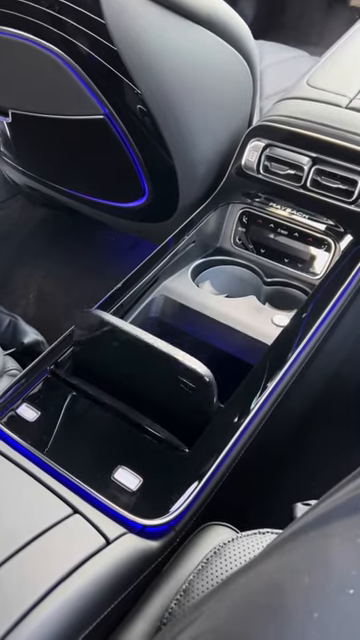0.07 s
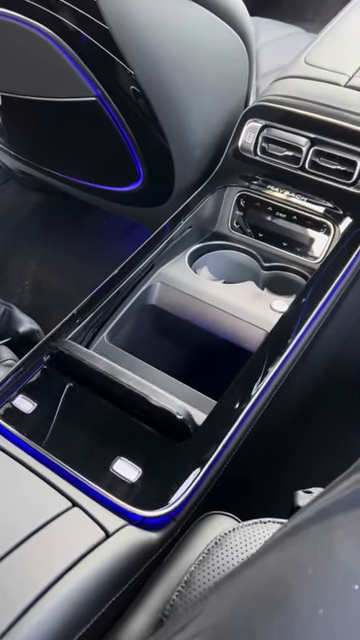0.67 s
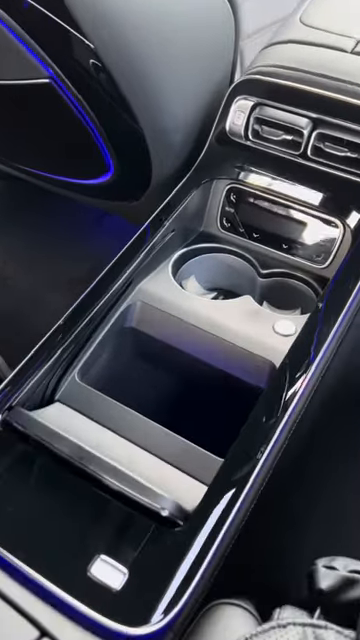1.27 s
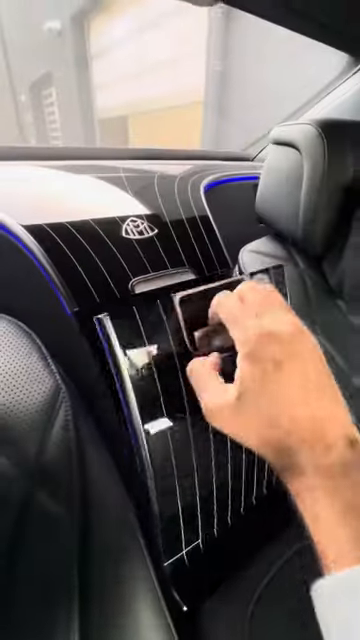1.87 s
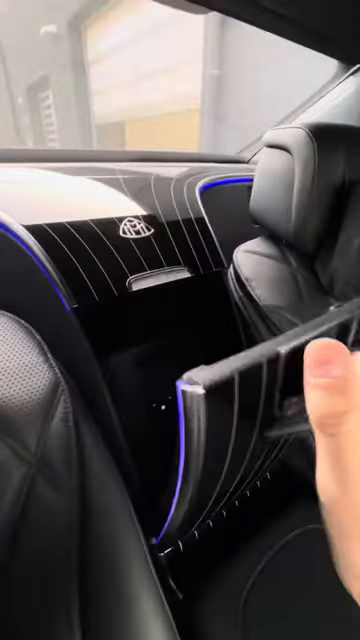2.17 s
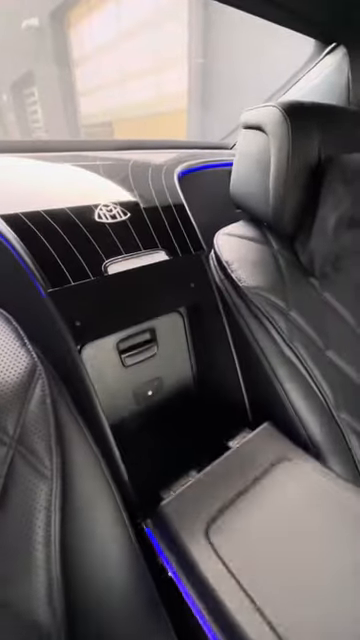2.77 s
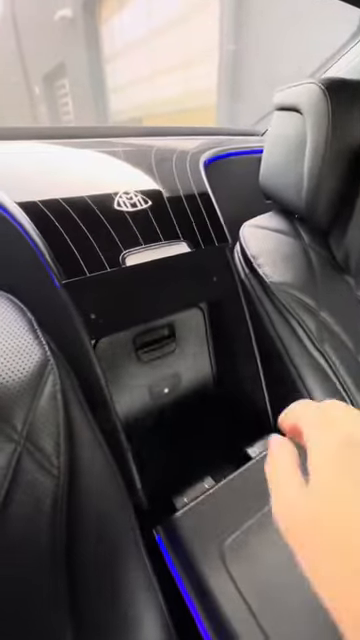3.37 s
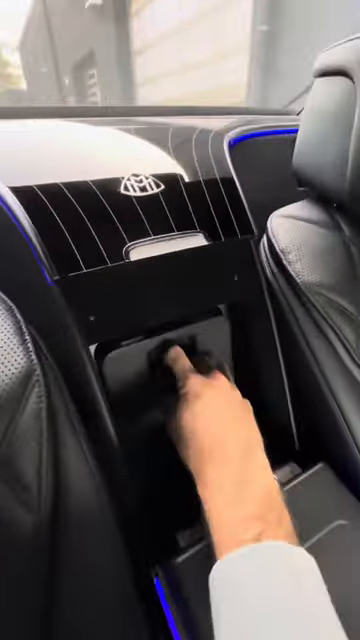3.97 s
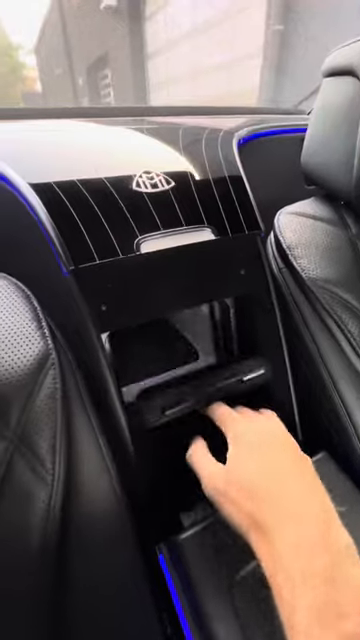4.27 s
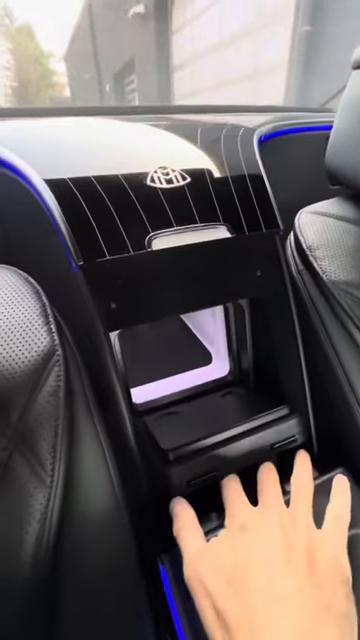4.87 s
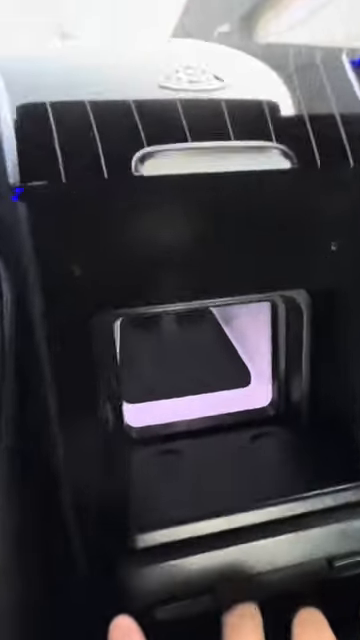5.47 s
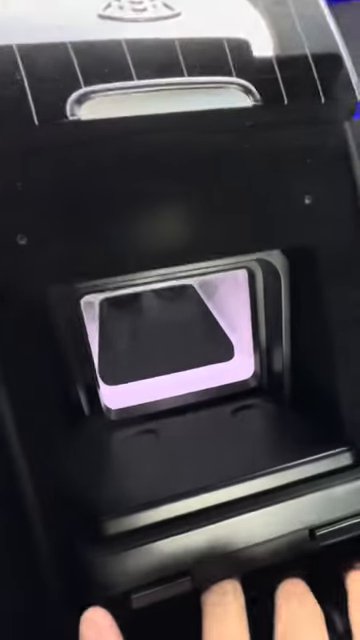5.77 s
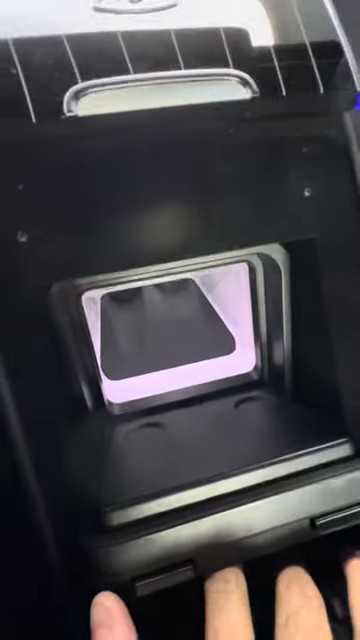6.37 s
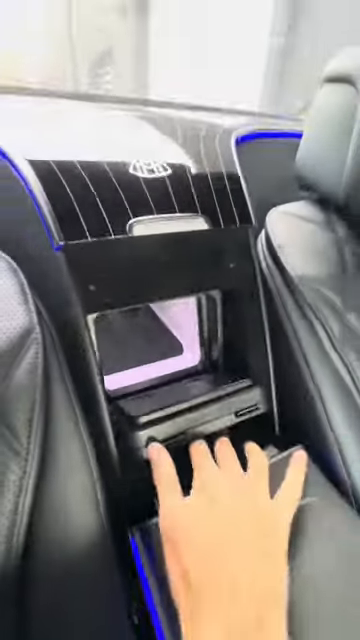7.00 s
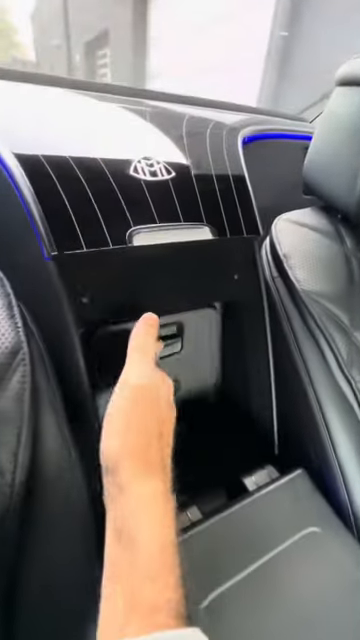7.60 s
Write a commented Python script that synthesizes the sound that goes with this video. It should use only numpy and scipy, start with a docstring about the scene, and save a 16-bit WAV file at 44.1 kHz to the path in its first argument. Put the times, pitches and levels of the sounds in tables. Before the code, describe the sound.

Inside a padded car cabin, a small geared motor whirrs as a console lid slides away. A hand unlatches the rear armrest with sharp clicks and lowers it with dull knocks and rubbing on leather. A plastic refrigerator hatch clacks open, a fan sings very faintly and a sleeve swishes. The hinge rubs, and the hatch slams shut with a hard crack and a boom. Everything is close, over the low hum of the idling engine.

```python
"""A car's rear armrest and the refrigerator hatch behind it knock and boom in the padded cabin.
First a geared motor whirrs a console lid away. Then a hand unlatches the armrest, lowers it, opens
the hatch and at last slams it shut. Each blow makes a plastic panel ring; hand, sleeve and hinges rub.
The idling engine hums underneath, and the refrigerator's fan sings faintly while the hatch is open."""
import sys
import numpy as np
from scipy import signal
from scipy.fft import rfft, irfft, next_fast_len
from scipy.io import wavfile
from scipy.ndimage import map_coordinates

SR = 44100
rng = np.random.default_rng(int(sys.argv[2]) if len(sys.argv) > 2 else 0)


def to_wav(s):
    """Save 16-bit WAV."""
    ch = np.atleast_2d(s).T  # columns
    pcm = np.round(np.clip(ch, -1, 1) * 32767)  # PCM
    wavfile.write(sys.argv[1], SR, pcm.astype(np.int16))


N = 336924
TIME = np.arange(N) / SR  # seconds since the start
AGE = np.arange(SR // 2) / SR  # seconds since a knock

# Levels in the tables are relative; t60 is the time a sound takes to fall by 60 dB.
# tone colour of rubbing: f/Hz, level/dB
RUB_SPECTRUM = [(560, -1.5), (950, -11), (1400, -5.5), (1900, -11.5), (2700, -6.5), (5000, -18.5),
                (8200, -21.5), (11000, -29), (14000, -39)]
# tone colour of clicks and thuds: f/Hz, level/dB
CLICK_SPECTRUM = [(400, 3), (1600, -3.5), (2400, 0), (3300, -8), (5000, -17), (9000, -22), (16000, -43)]


def amp(db):
    """Turn decibels into a gain."""
    return 10 ** (np.asarray(db) / 20)


def unit(x):
    """Scale to an average strength (rms) of 1."""
    return x / np.sqrt(np.mean(x ** 2) + 1e-20)


def along(points, hz):
    """Read between (frequency, value) points on a log axis."""
    f, values = np.transpose(points)
    return np.interp(np.log(hz + 1), np.log(f + 1), values)


def over_time(points):
    """Join (time, value) points into one value per sample."""
    return np.interp(TIME, *np.transpose(points))


def between(start, end, edge):
    """1 from start to end, with ramps edge seconds long."""
    return np.clip(np.minimum(TIME - start, end - TIME) / edge + .5, 0, 1)


def fade(t60, rise):
    """Rise quickly, then die away."""
    return np.exp(-np.log(1000) * AGE / t60) * (1 - np.exp(-AGE / rise))


def wobble(rate, size=N):
    """A smooth curve through rate random values a second."""
    values = rng.standard_normal(int(size * rate / SR) + 4)
    return map_coordinates(values, [np.arange(size) * rate / SR])


def add(track, s, sound):
    """Mix a sound into the track at s seconds."""
    part = track[:, max(round(s * SR), 0):][:, :sound.shape[-1]]
    part += sound[..., :part.shape[-1]]


def tone(hz, waver):
    """A slightly unsteady sine of rms 1."""
    return np.sqrt(2) * np.sin(2 * np.pi * np.cumsum(hz * (1 + waver * wobble(25))) / SR)


def resonance(hz, width):
    """A spectrum with one peak, as (f/Hz, level/dB) rows."""
    f = hz * 2 ** np.linspace(-4, 4, 401)
    return np.c_[f, -10 * np.log10(1 + ((f / hz - hz / f) * hz / width) ** 4)]


def noise(spectrum, size=N, band=None):
    """Stereo noise of rms 1 with the given tone colour, optionally within one band."""
    # how alike left and right are: f/Hz, likeness (1 = the same)
    likeness = [(250, 0.98), (700, 0.6), (2000, 0.94), (4500, 0.19), (10000, 0.8)]
    m = next_fast_len(size)
    hz = np.fft.rfftfreq(m, 1 / SR) + 1
    gain = amp(along(spectrum, hz))
    if band:
        gain = gain / np.sqrt((1 + (band[0] / hz) ** 8) * (1 + (hz / band[1]) ** 8))
    spread = np.arccos(np.clip(along(likeness, hz), -1, 1)) / 2
    white = rfft(rng.standard_normal((2, m)))
    mid, side = irfft(white * gain * [np.cos(spread), np.sin(spread)], m)[:, :size]
    return unit(np.array([mid + side, mid - side]))


def tilted(db, bright_db):
    """Low, middle and high levels: harder contact favours the treble."""
    return db - bright_db, db, db + bright_db


def rustle(db, bright_db, size):
    """Rubbing noise in three bands, the middle one eased by 1 dB."""
    # borders of the bands: f/Hz
    edges = [500, 1800, 5500, 16000]
    return sum(amp(level - (k == 1)) * noise(RUB_SPECTRUM, size, edges[k:k + 2])
               for k, level in enumerate(tilted(db, bright_db)))


def stroke(start, end, pressure_db=1.5):
    """Friction swells and dies, catching and slipping on the way; gives its onset and strength."""
    edge = .025 + (end - start) / 10
    t = np.arange(int((end - start + 2 * edge) * SR)) / SR
    swell = np.sin(np.pi / 2 * np.clip(np.minimum(t, t[-1] - t) / (2 * edge), 0, 1)) ** 2
    slips_db = 2 * wobble(420, len(t))
    return start - edge, swell * unit(amp(slips_db + pressure_db * wobble(32.6, len(t))))


def lid_motor(home_s, full_load_s=0.99, gear_hz=50.1, whine_hz=907):
    """Gears whirr, rattle and hiss; the motor slows and strains as the lid nears its stop."""
    # tones of the first gears' meshing teeth: f/Hz, level/dB
    mesh_tones = [(301, -61), (350, -66), (1249, -66.5), (1297, -68), (1952, -70.5), (3002, -77),
                  (3305, -76.5), (3895, -72), (4307, -79), (4554, -75.5)]
    # tone colour of the whirr: f/Hz, level/dB
    whirr_spectrum = [(150, -28), (240, -9), (320, -0.5), (430, -12), (680, -9), (1100, -16.5),
                      (2200, -21.5), (2750, -28), (5400, -29.5), (7000, -55)]
    load = np.clip(2 * TIME / full_load_s - 1, 0, 1)
    speed = 1 - 0.19 * load
    first_stage, moving = between(-1, 0.31, edge=0.1), between(-1, home_s, edge=0.034)
    surge_db = 7.5 * np.exp(-TIME / 0.26)
    run_on = amp(-66) * between(home_s, 1.447, edge=0.11)
    effort = moving * amp(-59 + surge_db) + run_on
    mesh = sum(amp(db + 2) * unit(amp(3 * wobble(70))) * tone(hz, waver=0.0025)
               for hz, db in mesh_tones)
    housing = resonance(4000, width=550)
    rasp = noise(housing, round(SR / gear_hz))
    buzz = amp(-66) * rasp[:, np.arange(N) % rasp.shape[1]]  # the same rasp on every turn
    hiss = moving * amp(-73) * noise(housing)
    chatter = unit(amp(2.3 * tone(2 * gear_hz * speed, waver=0.048) + wobble(29.66)))
    strain = amp(-73.5 + 11.5 * load) * between(-1, full_load_s, edge=0.18)
    whine = strain * tone(whine_hz * speed, waver=0.0057)
    return chatter * (effort * noise(whirr_spectrum) + hiss + first_stage * (mesh + buzz)) + whine


def engine_hum(firing_hz=50.74):
    """The idling engine hums at its firing rate, swelling and fading as the listener moves."""
    # strength of the deepest tone: t/s, level/dB
    hum_levels = [(0.0, -32.5), (1.37, -52.5), (1.5, -31), (1.95, -38.5), (2.14, -49), (3.13, -39),
                  (3.53, -47), (3.87, -35.5), (5.82, -41.5), (6.45, -33), (7.6, -32)]
    # higher tones: multiple of the firing rate, level/dB
    harmonics = [(2, -52), (3, -60.5)]
    phase = 2 * np.pi * np.cumsum(firing_hz * (1 + .008 * wobble(3.0))) / SR
    hum = amp(over_time(hum_levels) - 1 + 0.83 * wobble(8.1)) * np.sin(phase)
    overtones = sum(amp(db + 2.9 * wobble(6.2)) * np.sin(k * phase) for k, db in harmonics)
    return np.sqrt(2) * (hum + overtones)


def cabin_air():
    """The cabin rumbles steadily and the air vents hiss."""
    # tone colours of rumble and hiss: f/Hz, level/dB
    rumble_spectrum = [(22, -46), (33, -25), (45, -2), (65, 5.5), (85, -0.5), (110, -2), (170, -12),
                       (450, -23), (620, -47.5), (2000, -92.5)]
    hiss_spectrum = [(350, -17.5), (600, -4), (830, -4.5), (1400, -10.5), (2000, -7.5), (3300, -15.5),
                     (8300, -19.5), (12000, -31.5), (16000, -50.5)]
    # strength of the hiss: t/s, level/dB
    hiss_levels = [(0, -77.5), (2, -69), (3.25, -75.5), (3.7, -69), (7.6, -68.5)]
    return amp(-45.5) * noise(rumble_spectrum) + amp(over_time(hiss_levels)) * noise(hiss_spectrum)


def lid_rails(home_s, enter_s=.812, scuff_s=0.051):
    """The lid scuffs into its rails and slides home along them."""
    # tone colour of the slide: f/Hz, level/dB
    slide_spectrum = [(900, -23), (1800, -7.5), (2420, 1), (3300, -7.5), (4100, -12), (4800, -7),
                      (6000, -13.5), (7500, -26), (14000, -40)]
    out = np.zeros((2, N))
    s, grip = stroke(enter_s, enter_s + scuff_s)
    add(out, s, grip * rustle(db=-63.5, bright_db=-3, size=len(grip)))
    s, grip = stroke(enter_s, home_s)
    add(out, s, amp(-62.5) * grip * noise(slide_spectrum, len(grip)))
    return out


def ticks():
    """Light clicks, each with a brief rattle and ping."""
    # The first is a bare click as the hum jumps up; the rest are catches, hinges and fingernails.
    # clicks: t/s, tick level/dB, snap level/dB, ping f/Hz
    clicks = [(1.446, -50.5, -57.5, 800), (1.997, -53.5, -44.5, 2200), (2.27, -51.5, -47.5, 2700),
              (3.898, -47, -56, 2250), (4.302, -52.5, -63.5, 2480), (4.653, -47.5, -67, 800),
              (6.603, -39, -48, 2620), (7.318, -42, -38.5, 1270), (7.562, -40, -49, 2600)]
    out = np.zeros((2, N))
    for s, tick_db, snap_db, hz in clicks:
        click = fade(0.017, 0.0017) + amp(-15.5) * fade(0.11, 0.0043)
        tick = amp(tick_db) * noise(CLICK_SPECTRUM, len(AGE), (500, 5000))
        snap = amp(snap_db) * noise(CLICK_SPECTRUM, len(AGE), (5000, 16000))
        ping = amp(tick_db - 2) * fade(.04, 2 / hz) * np.sin(2 * np.pi * hz * AGE)
        add(out, s, 2 * click * (tick + snap) + ping)
    return out


def rubs():
    """Hand and sleeve rustle over leather and trim."""
    # strokes: start t/s, end t/s, level/dB, brightness/dB per band
    strokes = [(1.561, 1.628, -57, -2.5), (1.752, 1.796, -60, 2), (1.882, 1.93, -63, 2),
               (2.554, 2.688, -55, 0), (2.757, 2.874, -63.5, -4), (2.95, 3.09, -66, 1.5),
               (3.872, 3.914, -58.5, -2.5), (3.934, 3.984, -52, -8), (4.068, 4.251, -68.5, -5),
               (4.323, 4.834, -67.5, -1.5), (7.04, 7.138, -59.5, -0.5), (7.227, 7.331, -55.5, 2)]
    out = np.zeros((2, N))
    for start, end, db, bright_db in strokes:
        s, grip = stroke(start, end)
        add(out, s, grip * rustle(db, bright_db, len(grip)))
    return out


def trim_creak(friction, t60=0.076, ring_db=-4.5):
    """Friction sets the trim's many resonances creaking."""
    response = rng.standard_normal(len(AGE)) * fade(t60, 1 / SR)
    ringing = signal.fftconvolve(friction, response[None] / np.linalg.norm(response), axes=1)[:, :N]
    return (friction + amp(ring_db) * ringing) / np.hypot(1, amp(ring_db))


def ring(modes, band_levels, scatter_db=2.5):
    """A struck part rings at its own tones (modes); low ones travel slower and arrive later."""
    out = 0
    for hz, db, t60 in modes:
        scatter, phase = rng.standard_normal(2)
        level = db + scatter_db * scatter + np.interp(hz, [1300, 2100, 6000], band_levels)
        envelope = np.interp(AGE - 1.3 / hz, AGE, fade(t60, 0.66 / hz))
        out = out + amp(level) * envelope * np.sin(2 * np.pi * (hz * AGE + phase))
    return out


def blows(rows, modes, colour, rise, ring_db, rattle_db, snap_db, crack_db, tail_t60, thud_db):
    """Each blow starts with a crack, rings and rattles the panel and thuds in its padded frame."""
    out = np.zeros((2, N))
    for s, db, bright_db, t60 in rows:
        low, middle, high = tilted(db, bright_db)
        tail = amp(-18.5) * fade(tail_t60, 0.0046)  # the upholstery returns very little
        decay = fade(t60, rise) + tail
        crack = amp(crack_db) * fade(0.0045, rise)
        body = amp(ring_db) * ring(modes, (low, middle, high)) * (1 - np.exp(-AGE / rise))
        thud = amp(low + thud_db) * noise(CLICK_SPECTRUM, len(AGE), (150, 900)) * fade(2.4 * t60, rise)
        rattle = amp(middle + rattle_db) * noise(colour, len(AGE), (1000, 5000)) * decay
        snap = amp(high + snap_db) * noise(colour, len(AGE), (5000, 16000)) * (decay + crack)
        add(out, s, body + thud + rattle + snap)
    return out


def armrest():
    """The latch takes up slack and lets go; the padded armrest knocks as it is lowered."""
    # blows on latch and armrest: t/s, level/dB, brightness/dB per band, t60/s
    latch_clicks = [(1.572, -43, -8.5, 0.047), (1.625, -51.5, -8.5, 0.07), (1.643, -23.5, -3.5, 0.027)]
    knocks = [(1.692, -25.5, -6, 0.058), (1.6925, -28, -15.5, 0.035), (1.879, -53, -2.5, 0.043),
              (2.322, -59, -8, 0.12), (2.482, -40.5, -3.5, 0.11), (2.4965, -27, -2.5, 0.033),
              (2.604, -52, -9, 0.09), (2.824, -55.5, -17.5, 0.11), (2.836, -52, -0.5, 0.164)]
    # their ringing tones: f/Hz, level/dB, t60/s
    latch_modes = [(540, -8.5, .09), (907, 2.5, 0.049), (2190, -1, .047), (4400, 0.5, 0.041),
                   (4830, 2.5, 0.039)]
    panel_modes = [(300, 3.5, 0.074), (400, -5, 0.083), (524, -10, 0.09), (782, -6, 0.072),
                   (894, -4.5, 0.06), (979, -3.5, 0.06), (1182, -10, .06), (1286, -10, 0.088),
                   (1990, -11.5, 0.069), (2720, -9, .06)]
    # tone colour of the contact: f/Hz, level/dB
    colour = [(710, -26.5), (1200, -7), (1790, -11.5), (2090, -11.5), (3550, -14), (4600, -17.5),
              (7910, -17.5), (16000, -34.5)]
    padded = dict(rise=0.0027, ring_db=1.0, rattle_db=6.5, snap_db=3.5, crack_db=-3.5,
                  tail_t60=0.15, thud_db=-5.5)
    knocking = blows(knocks, panel_modes, colour, **padded)
    return knocking + blows(latch_clicks, latch_modes, colour, **padded)


def booms():
    """Knocked panels and the cabin air boom, taking about one cycle to build up."""
    # deep tones: t/s, f/Hz, peak level/dB, t60/s
    deep_tones = [(1.7, 121.5, -25.5, 0.23), (1.726, 72.8, -21.5, 0.12), (2.509, 114.7, -27.5, 0.12),
                  (2.83, 191, -36, 0.19), (2.837, 71.2, -30.5, 0.63), (3.781, 312, -38.5, 0.039),
                  (3.932, 206, -29.5, 0.097), (3.94, 66, -20.5, 0.21), (4.033, 136.6, -19, 0.2),
                  (7.602, 203, -7, 0.034), (7.604, 96.6, -8.5, 0.7)]
    out = np.zeros((2, N))
    for s, hz, db, t60 in deep_tones:
        swell = fade(t60, 0.39 / hz)
        add(out, s, amp(db) * swell / swell.max() * np.sin(2 * np.pi * hz * AGE))
    return out


def scrapes():
    """Each scrape stirs just one resonance."""
    # strokes: start t/s, end t/s, f/Hz, width/Hz, level/dB
    strokes = [(1.88, 1.904, 2100, 500, -51), (2.4, 2.502, 2660, 150, -63),
               (3.049, 3.094, 1430, 500, -53.5), (3.063, 3.1, 640, 443, -50),
               (4.329, 4.476, 2860, 713, -63.5), (6.504, 6.589, 8100, 1500, -65),
               (7.18, 7.255, 844, 400, -50.5), (7.543, 7.613, 2250, 300, -53.5)]
    out = np.zeros((2, N))
    for start, end, hz, width, db in strokes:
        s, grip = stroke(start, end)
        add(out, s, amp(db) * grip * noise(resonance(hz, width), len(grip)))
    return out


def hinges(growth_db_per_s=21.5):
    """A hinge rubs louder as its swing gathers speed."""
    # swings of the armrest, then the hatch: start t/s, end t/s, final level/dB
    swings = [(2.279, 2.489, -61.5), (6.678, 7.316, -58)]
    out = np.zeros((2, N))
    for start, end, db in swings:
        s, grip = stroke(start, end, pressure_db=3.8)
        speed = amp(growth_db_per_s * (s + np.arange(len(grip)) / SR - end))
        add(out, s, speed * grip * rustle(db, bright_db=-2, size=len(grip)))
    return out


def hatch():
    """The plastic hatch clacks open and later slams shut with a hard crack."""
    # blows: t/s, level/dB, brightness/dB per band, t60/s
    knocks = [(3.9255, -26, -0.5, 0.041), (3.982, -61, -9, 0.036), (4.0125, -39, 0.5, 0.032),
              (4.026, -36, 1, 0.049), (7.5985, -12.5, 3, 0.045)]
    # ringing tones: f/Hz, level/dB, t60/s
    modes = [(256, 3.5, 0.06), (460, 2.5, 0.117), (656, 0.5, 0.076), (800, -1.5, 0.048), (1243, 3, 0.043),
             (1574, -6, 0.037), (2250, 5.5, 0.014), (3160, -3, 0.026), (6380, -7, 0.027),
             (8780, -14.5, 0.025)]
    # tone colour of the contact: f/Hz, level/dB
    colour = [(710, -6), (1250, -0.5), (1590, -4), (1780, -10.5), (2300, -6), (2750, -7.5), (4500, -17.5),
              (9010, -18), (10100, -25), (16000, -35)]
    return blows(knocks, modes, colour, rise=0.0005, ring_db=-1.5, rattle_db=0.0, snap_db=-12.5,
                 crack_db=13.5, tail_t60=0.21, thud_db=-3.5)


def fridge_fan(open_s=(4.05, 7.5), close_by_s=(5.33, 6.77)):
    """The fan sings through the open hatch, louder while the listener is close."""
    heard = between(*open_s, edge=0.26) * amp(-73.5 + 8 * between(*close_by_s, edge=0.26))
    return heard * (tone(511, waver=0.0019) + amp(-14.5) * noise(resonance(1970, width=350)))


def sleeve(start=5.262, end=5.49, fade_db_per_s=34):
    """A sleeve slips over the seat with a silky sheen, fading as the arm slows."""
    touching = between(start, np.inf, edge=0.031) * between(-np.inf, end, edge=0.094)
    slide = touching * amp(-fade_db_per_s * abs(TIME - start) + wobble(30))
    cloth = rustle(db=-60, bright_db=4, size=N)
    sheen = amp(-57) * noise(resonance(8150, width=1200))
    return slide * (cloth + sheen)


def trim_echoes(hz, count=9):
    """Glass and hard trim return the treble within milliseconds, differently on each side."""
    delays = rng.uniform(.0015, .009, (count, 2, 1))
    echoes = sum((-1) ** k * np.exp(-2j * np.pi * hz * d) for k, d in enumerate(delays))
    share = amp(-19.0) * (1j * hz / (1200 + 1j * hz)) ** 2
    return (1 + share * echoes) / np.sqrt(1 + count * abs(share) ** 2)


def from_rear(sound):
    """Sound from the rear arrives with echoes, out of step and unequal on the two sides."""
    # left minus right: f/Hz, level/dB
    balance = [(100, 0.92), (380, 2.5), (850, -4.5), (1500, 0), (4000, -0.5)]
    # how far left runs ahead of right: f/Hz, phase/rad
    lead = [(280, 0), (680, -1.8), (1400, -0.2), (3800, -0.54), (6000, -1.4)]
    m = next_fast_len(N + SR // 4)
    hz = np.fft.rfftfreq(m, 1 / SR)
    ears = np.array([[.5], [-.5]])
    lean = amp(along(balance, hz) * ears) * np.exp(1j * along(lead, hz) * ears)
    return irfft(rfft(sound, m) * trim_echoes(hz) * lean / lean.mean(0), m)[:, :N]


def scene(lid_home_s=1.15):
    """Mix knocks, friction and background with the console lid in front."""
    knocks = armrest() + hatch() + booms() + ticks()
    friction = trim_creak(rubs() + hinges() + scrapes() + sleeve())
    background = engine_hum() + fridge_fan() + cabin_air()
    return from_rear(knocks + friction + background) + lid_motor(lid_home_s) + lid_rails(lid_home_s)


def record(dry):
    """Round off the highest peaks and cut the very top of the treble."""
    ceiling, top_hz = .88, 15900
    rounded = dry / (1 + (dry / ceiling) ** 6) ** (1 / 6)
    m = next_fast_len(N + SR // 4)
    low_pass = np.interp(np.fft.rfftfreq(m, 1 / SR), [top_hz - 500, top_hz + 300], [1, 0])
    return irfft(rfft(rounded, m) * low_pass, m)[:, :N]


dry = scene()
out = record(dry)
to_wav(out)
```